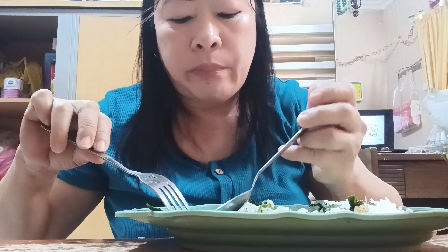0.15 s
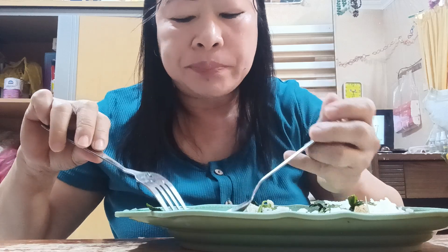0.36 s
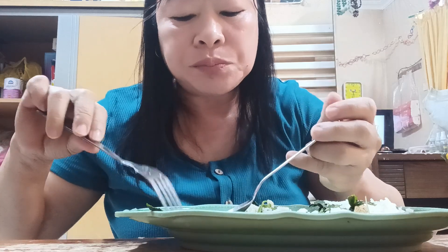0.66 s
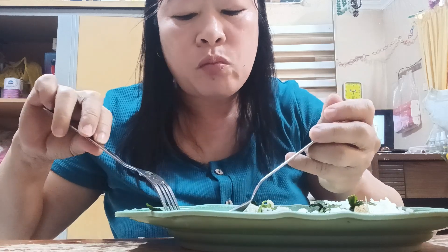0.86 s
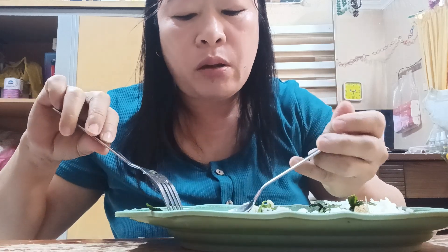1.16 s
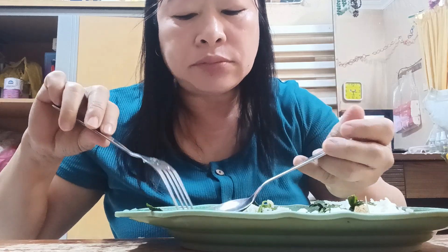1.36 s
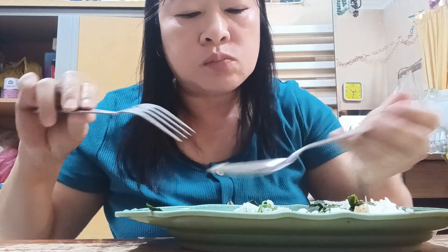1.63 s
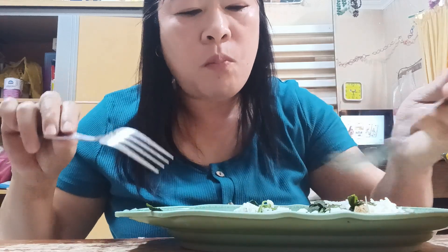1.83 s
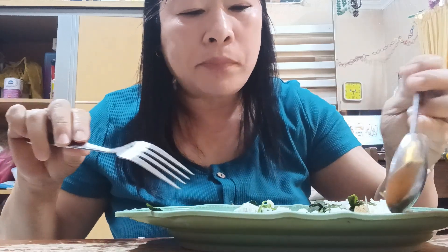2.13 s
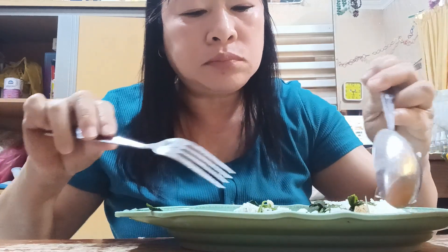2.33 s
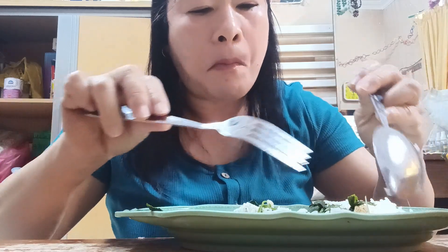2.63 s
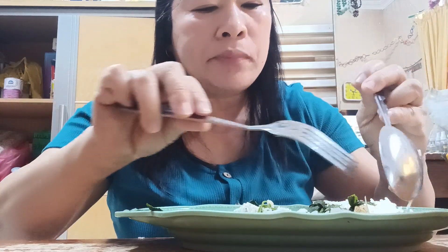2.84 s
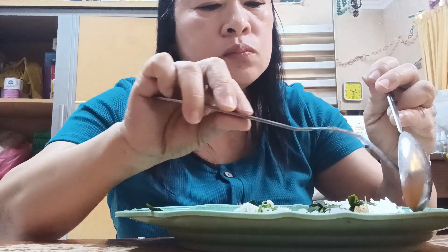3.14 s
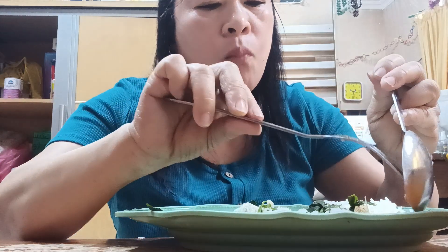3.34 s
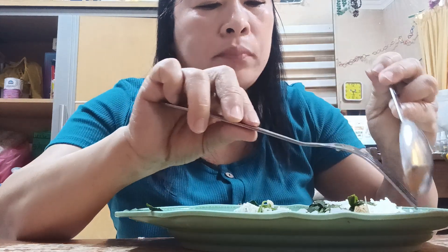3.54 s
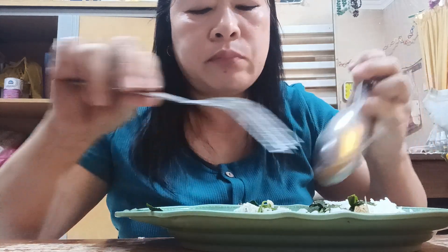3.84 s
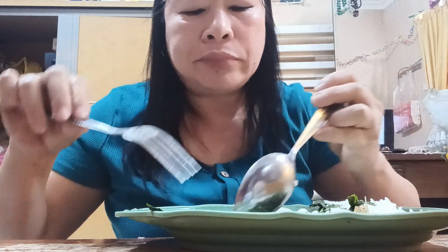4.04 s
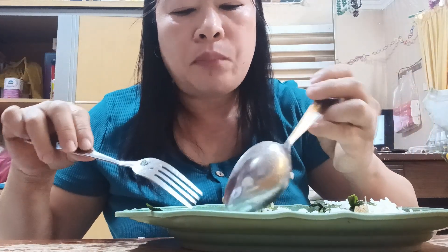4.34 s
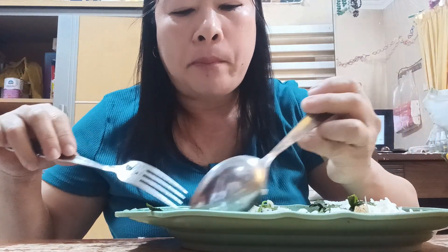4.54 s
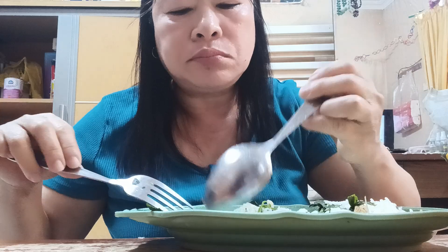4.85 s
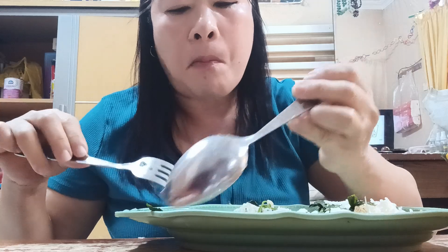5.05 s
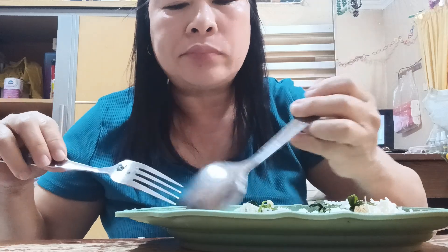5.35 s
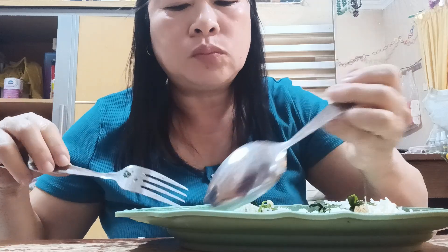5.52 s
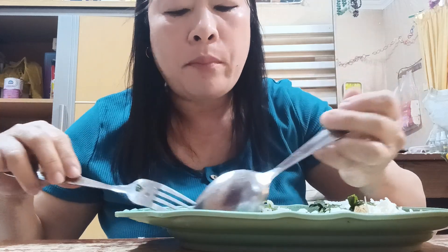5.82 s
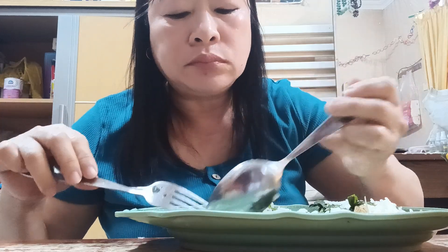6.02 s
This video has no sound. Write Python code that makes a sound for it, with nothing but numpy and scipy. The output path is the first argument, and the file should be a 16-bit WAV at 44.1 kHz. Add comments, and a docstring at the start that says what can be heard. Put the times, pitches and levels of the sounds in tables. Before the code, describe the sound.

Sparse cutlery taps grow into sharp knocks, then a busy run of clinks, scrapes and tiny squeaks on a dinner plate indoors.

```python
"""Cutlery on a plate

A steel spoon and fork knock, scrape and squeak on a plate close to a phone standing on a dining table.
Blows and strokes ring banks of damped modes; squeaks are sagging tones; moist food ticks in band noise.
A small hard room answers with an echo and a dense tail, over an appliance's hum, air and a low rumble.
The phone's look-ahead limiter flattens the hardest knocks."""
import sys
import numpy as np
from scipy import signal
from scipy.fft import rfft, irfft
from scipy.io import wavfile
from scipy.ndimage import uniform_filter1d

SR = 44100
rng = np.random.default_rng(int(sys.argv[2]) if len(sys.argv) > 2 else 0)


def transcribe(signal):
    """Save signal, clipped to [-1, 1], as a 16-bit WAV file at the path in sys.argv[1]."""
    frames = np.atleast_2d(signal).T
    limited = np.clip(frames, -1, 1)
    pcm = np.round(limited * 32767).astype(np.int16)
    wavfile.write(sys.argv[1], SR, pcm)


N = 272521
TIME = np.arange(N) / SR


def amp(db):
    """Turn decibels into an amplitude factor."""
    return 10 ** (np.asarray(db) / 20)


def unit(x):
    """Scale a sound to an RMS of one."""
    return x / np.sqrt(np.mean(x ** 2) + 1e-18)


def add(out, s, x):
    """Mix a sound in at time s."""
    i = max(int(s * SR), 0)
    out[:, i:i + x.shape[-1]] += x[..., :N - i]


def band(x, lo, hi, order=5):
    """Keep the range from lo to hi Hz."""
    sos = signal.butter(order, [lo, min(hi, SR / 2 - 100)], "band", fs=SR, output="sos")
    return signal.sosfilt(sos, x)


def curve(points, hz):
    """Read (Hz, value) points on a log-frequency axis."""
    f, value = np.transpose(points)
    return np.interp(np.log(np.maximum(hz, 1)), np.log(f), value)


def stereo_noise(n, alike_hz):
    """Noise at the two ports: alike in the bass, unrelated in the treble."""
    hz = np.arange(n // 2 + 1) * SR / n
    alike = 1 / (1 + (hz / alike_hz) ** 4)
    shared = rfft(rng.standard_normal(n))
    own = rfft(rng.standard_normal((2, n)))
    return irfft(np.sqrt(alike) * shared + np.sqrt(1 - alike) * own, n)


def ring(modes, t, damping, spread, scatter_db=0, loss=0):
    """Free ringing of damped modes: scatter reweights them, loss shortens the higher ones."""
    hz, width, db = np.transpose(modes)[:, :, None]
    # the contact point weights the modes
    size = amp(db + scatter_db * rng.standard_normal(hz.shape)) * width
    phase = rng.uniform(0, 2 * np.pi, hz.shape)
    # higher modes reach the two ports in different phase
    phase = phase + spread * np.minimum(hz / 3000, 1) * rng.standard_normal((2,) + hz.shape)
    # the grip damps the higher modes
    decay = np.exp(-np.pi * (damping * width + loss * hz) * t)
    return unit(np.sum(size * decay * np.sin(2 * np.pi * hz * t + phase), axis=1))


# appliance hum: f/Hz, level/dB before the blend of steady and wavering tone, wavering share (0-1)
HUM = [(55.7, -60.5, 0.64), (99.1, -54.5, 0.57), (225.3, -57.5, 0.83)]
# colour of the room air: f/Hz, relative level/dB per Hz
AIR_COLOUR = [(25, -22.5), (70, -20.5), (130, -22.5), (300, -11.5), (450, -18.5), (750, -19), (1400, -25),
              (2800, -36), (5000, -42), (8000, -50), (10300, -40.5), (12500, -49.5), (16000, -52)]
AIR_DB = -49.5
# the low rumble builds while the spoon works on the plate, then drops back
RUMBLE_DB, SWELL_DB, SWELL_PEAK_S, SWELL_RISE_S, SWELL_FALL_S = -58.5, 13.5, 5.12, 2.06, 0.4


def background(sway_db=1.02):
    """A wavering hum of tones and narrow noise in swaying air, and the rumble of the table."""
    hz = np.arange(N // 2 + 1) * SR / N
    air = unit(irfft(rfft(stereo_noise(N, alike_hz=513)) * amp(curve(AIR_COLOUR, hz)), N))
    sway = unit(band(rng.standard_normal(N), 0.45, 11, order=1))
    hum = 0
    for f, db, waver in HUM:
        steady = np.sqrt(2) * np.sin(2 * np.pi * f * TIME)
        wavering = unit(band(rng.standard_normal(N), f - 5, f + 5, order=2))
        hum = hum + amp(db) * ((1 - waver) * steady + waver * wavering)
    swell = np.interp(TIME - SWELL_PEAK_S, [-SWELL_RISE_S, 0, SWELL_FALL_S], [0, 1, 0])
    rumble = unit(band(rng.standard_normal(N), 49, 63, order=2))
    rumble = amp(RUMBLE_DB + SWELL_DB * swell) * rumble
    return amp(AIR_DB + sway_db * sway) * air + hum + rumble


# short strokes across the plate: t/s, length/s, plate level/dB, fork tips relative to the plate/dB
STROKES = [(0.0, 0.04, -34, -5), (0.221, 0.043, -55, 0), (1.007, 0.15, -63.5, 7.5),
           (3.192, 0.049, -49.5, -29), (4.388, 0.15, -41, -14), (4.654, 0.085, -42.5, -11),
           (4.996, 0.13, -41, -17), (5.593, 0.062, -39, -2), (5.702, 0.14, -37.5, -12.5)]
# one long draw of the fork over the spoon: t/s, level/dB before DRAW_DB is added
DRAW = [(3.09, -52), (3.122, -53), (3.168, -44), (3.202, -63), (3.272, -57), (3.364, -36.5), (3.4, -71)]
# resonances of the plate (the blows ring them too): f/Hz, width/Hz, relative level/dB per width
PLATE = [(270, 13, -15.5), (369.7, 19.3, -8), (510.7, 13.9, 0.5), (622, 27.4, -5), (836, 69, -11),
         (905, 51, -7), (1078, 29, -12.5), (1222, 19, -6.5), (1813, 290, -8.5), (1772, 73, -5.5),
         (2055, 24, -4.5), (2285, 87, -6.5), (2429, 25, -2), (2662, 55, -6), (2883, 96, -10.5),
         (3692, 36, -8.5), (4202, 84, -7.5), (5090, 180, -8), (5950, 156, -6.5), (6700, 57, -33),
         (8710, 51, -39), (10490, 70, -3.5), (10960, 130, -7.5), (13230, 90, -57)]
# resonances of the fork's neck: f/Hz, width/Hz, relative level/dB per width
FORK_NECK = [(2620, 130, -7), (5400, 80, -3), (5610, 50, -5), (6280, 120, 0), (7330, 160, -6),
             (7750, 150, -8)]
# resonances of the fork's tips: f/Hz, width/Hz, relative level/dB per width
FORK_TIPS = [(8860, 510, -8), (9680, 53, 13), (10850, 190, 11), (11500, 130, 7.5), (12300, 140, 3.5),
             (12600, 98, -30), (14540, 71, 1), (14700, 63, -20.5)]
# fork and spoon pressed together: f/Hz, width/Hz, relative level/dB per width
CROSSED = [(2650, 94, -8.5), (5350, 170, -2), (6330, 120, 0), (7510, 210, -3), (9100, 310, -2),
           (10500, 52, -7), (11200, 24, 5.5), (11650, 150, -12), (12500, 130, -5), (13100, 140, -5),
           (14300, 41, -11), (15100, 48, -12)]
# every stroke presses in, holds and lifts off (shares of its length); the neck rings under the tips
PRESS_SHARE, LIFT_SHARE, NECK_DB = 0.16, 0.28, -6.5
DRAW_DB, DRAW_TIPS_DB, DRAW_PLATE_DB = 2, -9, -19  # tips and plate relative to the crossed pieces


def scrapes(grit_db=5, rasp_db=-9, build_s=0.0009):
    """Dense uneven slips of steel drive the plate, the fork and its tips, or fork and spoon together."""
    out, t = np.zeros((2, N)), np.arange(SR // 12) / SR
    slips = rng.standard_normal(N)
    # the grit changes every 64 samples
    slips = slips * np.repeat(amp(grit_db * rng.standard_normal(N // 64 + 1)), 64)[:N]

    bodies = [ring(modes, t, damping=1, spread=0.8) for modes in (PLATE, FORK_NECK, FORK_TIPS, CROSSED)]
    bodies[3] = bodies[3] * (1 - np.exp(-t / build_s))  # the joined pieces take a moment to ring up
    driven = [unit(signal.fftconvolve(slips[None], body, axes=1)[:, :N]) for body in bodies]
    plate, neck, tips, crossed = driven
    rasp = unit(band(slips, 590, 3000, order=1))
    plate = unit(plate + amp(rasp_db) * rasp)

    for start, length, db, steel_db in STROKES:
        along = (TIME - start) / length
        pressure = np.clip(np.minimum(along / PRESS_SHARE, (1 - along) / LIFT_SHARE), 0, 1)
        fork = tips + amp(NECK_DB) * neck
        out += amp(db) * pressure * (plate + amp(steel_db) * fork)

    # silent before and after the draw
    draw_db = np.interp(TIME, *np.transpose(DRAW), left=-np.inf, right=-np.inf)
    drawn = crossed + amp(DRAW_TIPS_DB) * tips + amp(DRAW_PLATE_DB) * plate
    return out + amp(DRAW_DB + draw_db) * drawn


# cutlery blows: t/s, clink level/dB at 1.5-3.2 kHz, then relative to the clink:
# weight on the plate/dB (below 1.5 kHz), hardness of the contact/dB (3.2-8 kHz)
BLOWS = [(0.02, -43.5, 10, 4), (0.0384, -32, 5, 0), (0.5818, -30, -33, -1), (0.5966, -44.5, -25, 4),
         (0.8053, -30.5, -5, -7), (0.845, -61, -16, 7.5), (1.071, -66.5, -2, 14), (1.9567, -21, 1, -8),
         (2.0377, -36, 5, -14.5), (2.0762, -43.5, 8, -17), (2.4263, -15, -1.5, -2), (2.606, -6.5, -1, 1.5),
         (2.917, -24, 1, -8.5), (3.0681, -56, 22.5, 13), (4.3664, -17, -3, -5.5), (4.5243, -32.5, -11.5, 5),
         (4.5455, -6.5, -10.5, -8.5), (4.968, -16, -3, -5), (4.991, -22.5, 2.5, -7), (5.0298, -24, -1, -17),
         (5.0693, -30, 4, -12.5), (5.1247, -41, -2, -1), (5.2499, -5.5, -9, -5.5),
         (5.5378, -16.5, -0.5, -2.5), (5.6517, -14.5, -6, -3.5), (5.721, -26.5, -19, -6.5)]
# resonances of the spoon: f/Hz, width/Hz, relative level/dB per width
SPOON = [(1790, 90, -4), (1890, 60, -2), (2570, 110, -2), (5120, 120, 0), (6000, 150, -10),
         (7560, 130, -13), (9770, 170, -9), (11440, 110, -9), (13000, 120, -15)]
# edges of the bands of weight, clink, hardness and sparkle: f/Hz
BLOW_BAND_EDGES = [250, 1500, 3200, 8000, 13800]
# a harder contact lifts the top octave faster than the treble
SPARKLE_DB, SPARKLE_PER_HARDNESS = -1.5, 1.82
# a heavier blow rings the plate more than the spoon: plate level at zero weight
KNOCK_DB = 8.5


def blows(crack_db=-1, crack_t60=0.02, spoon_db=-9, rise_s=0.0016, contact_s=0.022,
          after_db=-6, glance=1.0, grip_shift=0.014):
    """Each blow cracks and rings plate and spoon; its weight and hardness set its colour."""
    out, t = np.zeros((2, N)), np.arange(SR // 8) / SR
    attack = SR * 12 // 1000  # the first 12 ms set the band levels
    for s, clink_db, weight_db, hard_db in BLOWS:
        crack = unit(stereo_noise(len(t), alike_hz=2310) * amp(-60 * t / crack_t60))
        bend = 1 + grip_shift * rng.standard_normal()  # the load of the cutlery detunes the plate
        plate = ring(PLATE, bend * t, damping=1.58, spread=0.76, scatter_db=3, loss=0.0027)
        knock = plate + amp(crack_db) * crack
        spoon = ring(SPOON, t, damping=1.1, spread=0.7, scatter_db=2)
        hit = amp(KNOCK_DB + weight_db) * knock + amp(spoon_db) * spoon

        # a glancing blow that hardly moves the plate is over sooner
        firm = amp(glance * np.clip(weight_db, -12, 0))
        # the hand and the food smother most of the ring within milliseconds
        smother = firm * amp(after_db) + np.exp(-(t / (firm * contact_s)) ** 2)
        hit = hit * (1 - np.exp(-t / rise_s)) * smother

        sparkle_db = SPARKLE_DB + SPARKLE_PER_HARDNESS * hard_db
        colour_db = weight_db, 0, hard_db, sparkle_db
        coloured = 0
        for gain_db, lo, hi in zip(colour_db, BLOW_BAND_EDGES, BLOW_BAND_EDGES[1:]):
            part = band(hit, lo, hi)
            coloured = coloured + amp(gain_db) * part / part[:, :attack].std(axis=1, keepdims=True)
        add(out, s, amp(clink_db) * coloured)
    return out


# room decay: f/Hz, t60/s
ROOM_T60 = [(200, 0.25), (530, 0.19), (1400, 0.19), (3700, 0.19), (9700, 0.18), (15000, 0.19)]


def room(x, wet_db=-7, build_s=0.0009, treble_db=-2.0, echo_db=-17, echo_s=0.018):
    """Dense reflections from near walls build up quickly and die at a rate set for each band."""
    t = np.arange(SR // 2) / SR
    edges = np.geomspace(120, 17000, 9)
    noise, tail = stereo_noise(len(t), alike_hz=750), 0
    for lo, hi in zip(edges, edges[1:]):
        hz = np.sqrt(lo * hi)
        decay_db = treble_db * hz / 10000 - 60 * t / curve(ROOM_T60, hz)
        tail = tail + band(noise, lo, hi, order=3) * amp(decay_db)
    tail = unit(tail * (1 - np.exp(-(t / build_s) ** 2))) / np.sqrt(len(t))
    wet = signal.fftconvolve(x, tail, axes=1)[:, :N]
    echo = np.pad(x, ((0, 0), (int(echo_s * SR), 0)))[:, :N]  # the nearest wall answers on its own
    return amp(wet_db) * wet + amp(echo_db) * echo


# the clearest wet ticks of food: t/s, level/dB before gain and envelope, centre f/Hz
SQUISHES = [(0.69, -44, 3140), (0.959, -41.5, 6400), (0.973, -37.5, 10000), (3.471, -39, 2960),
            (3.889, -42, 4700)]
# fainter ones come at random, with levels on the same scale
SQUISH_COUNT, SQUISH_DB, SQUISH_SCATTER_DB = 12, -48.5, 1.5
SQUISH_HZ, SQUISH_SCATTER_OCT = 4450, 0.54


def food(gain_db=-10, swell_s=0.0023, width=1.23):
    """Moist food parts in small, quick ticks of band noise: a few clear ones among faint random ones."""
    out, t = np.zeros((2, N)), np.arange(SR // 25) / SR
    faint = []
    for _ in range(SQUISH_COUNT):
        s = rng.uniform(0, TIME[-1])
        db = SQUISH_DB + SQUISH_SCATTER_DB * rng.standard_normal()
        hz = SQUISH_HZ * 2 ** (SQUISH_SCATTER_OCT * rng.uniform(-2, 1.2))
        faint.append((s, db, hz))
    envelope = t / swell_s * np.exp(1 - t / swell_s)  # peaks at swell_s
    for s, db, hz in SQUISHES + faint:
        tick = unit(band(stereo_noise(len(t), alike_hz=4000), hz / width, hz * width, order=2))
        add(out, s, amp(db + gain_db) * tick * envelope)
    return out


# thin high notes of steel ring on: the spoon after its knock at 1.956 s, the fork's tines after
# the two scrapes: t/s, f/Hz, starting level/dB of the sine's peak, t60/s
STEEL_NOTES = [(1.956, 11450, -27.5, 0.072), (3.36, 10247, -55, 0.58), (4.7, 10160, -58, 0.36)]


def steel_notes():
    """Thin high notes of spoon and fork: single modes as sines that die away exponentially."""
    out, t = np.zeros((2, N)), np.arange(SR // 2) / SR
    for s, hz, db, t60 in STEEL_NOTES:
        add(out, s, amp(db - 60 * t / t60) * np.sin(2 * np.pi * hz * t))
    return out


# squeaks of steel sticking and slipping: t/s, length/s, first pitch f/Hz, level/dB before the fade
SQUEAKS = [(4.41, 0.082, 990, -42.5), (5.02, 0.062, 977, -32.5), (5.062, 0.055, 696, -29),
           (5.727, 0.06, 392.3, -29.5), (5.731, 0.105, 949, -40.5)]
SQUEAK_SAG_OCT_PER_S = 1.97  # the pitch falls as the stroke slows


def squeaks(jitter=0.036, octave_db=-11):
    """The slips lock into a short, unsteady, sagging tone with its octave."""
    out = np.zeros((2, N))
    for start, length, hz, db in SQUEAKS:
        t = np.arange(int(length * SR)) / SR
        wobble = unit(uniform_filter1d(rng.standard_normal(SR // 4), size=90))[:len(t)]
        pitch = hz * 2 ** (-SQUEAK_SAG_OCT_PER_S * t) * (1 + jitter * wobble)
        phase = 2 * np.pi * np.cumsum(pitch) / SR
        tone = unit(np.sin(phase) + amp(octave_db) * np.sin(2 * phase))
        add(out, start, amp(db) * tone * np.hanning(len(t)))
    return out


def scene():
    """Cutlery and food sound in the room; the background lies under them."""
    table = blows() + scrapes() + squeaks() + steel_notes() + food()
    return table + room(table) + background()


def limiter(x, ceiling=0.69, release_db_per_s=130):
    """The gain dips just before each peak that would overload and climbs back at a steady rate."""
    ahead_s, slew_s = 0.014, 0.006
    over_db = np.maximum(20 * np.log10(np.abs(x).max(axis=0) / ceiling + 1e-9), 0)
    recovery = release_db_per_s * TIME
    # hold the deepest cut so far, less what has recovered since
    cut_db = np.maximum.accumulate(over_db + recovery) - recovery
    cut_db = np.interp(TIME + ahead_s, TIME, cut_db)
    return x * amp(-uniform_filter1d(cut_db, int(slew_s * SR) + 1))


# the two ports differ in colour: f/Hz, left minus right level/dB
PORT_BALANCE = [(60, 4.5), (250, 3), (500, 4), (1100, 6), (2200, 5), (3800, 1.5), (8000, 2.5), (14000, 1.8)]
PORT_LAG = 38  # samples
TOP_HZ = 15800


def record(dry):
    """Sound reaches the left port later and louder; the phone limits the peaks and cuts the top."""
    hz = np.arange(N // 2 + 1) * SR / N
    half_balance_db = curve(PORT_BALANCE, hz) / 2
    left, right = irfft(rfft(dry) * amp(np.array([[1], [-1]]) * half_balance_db), N)
    ports = np.array([np.pad(left, (PORT_LAG, 0))[:N], right])
    top_cut = signal.ellip(8, 0.2, 70, TOP_HZ, fs=SR, output="sos")
    return signal.sosfilt(top_cut, limiter(ports))


dry = scene()
out = record(dry)
transcribe(out)
```